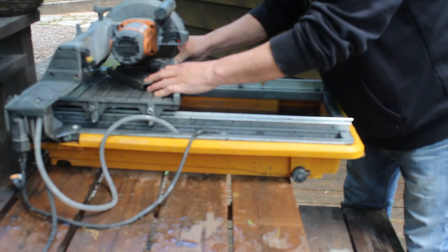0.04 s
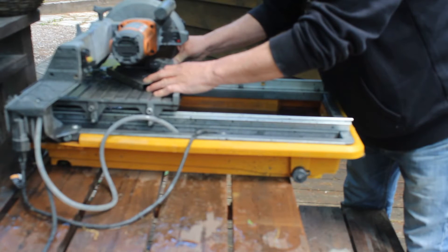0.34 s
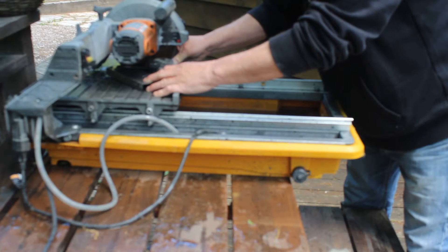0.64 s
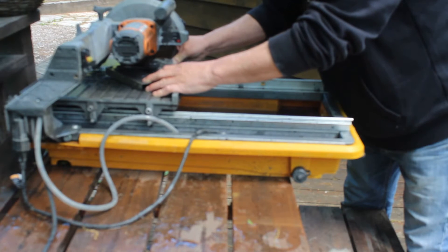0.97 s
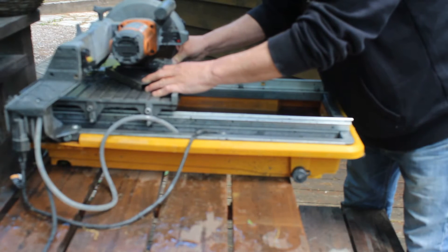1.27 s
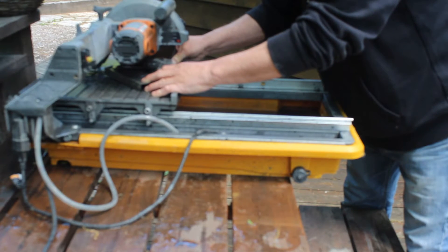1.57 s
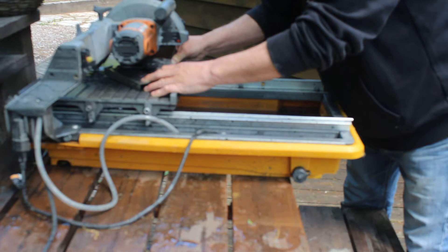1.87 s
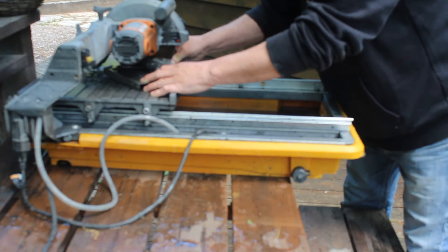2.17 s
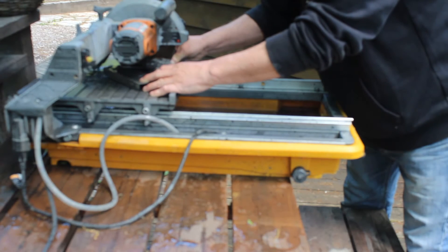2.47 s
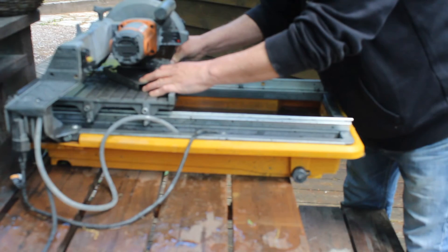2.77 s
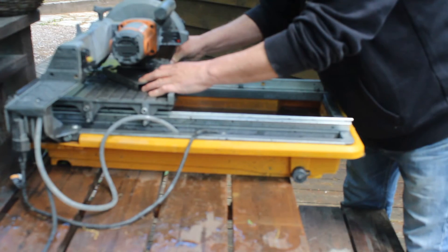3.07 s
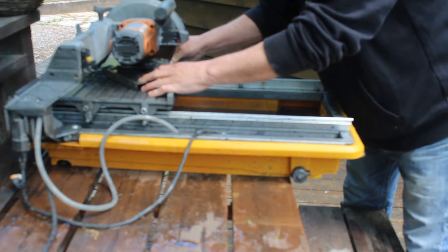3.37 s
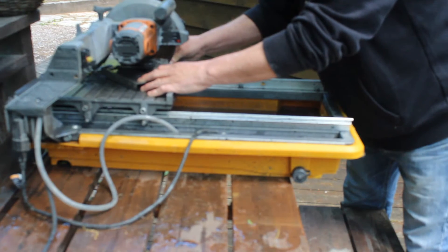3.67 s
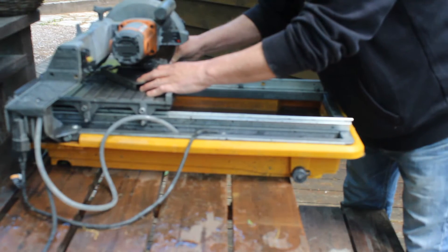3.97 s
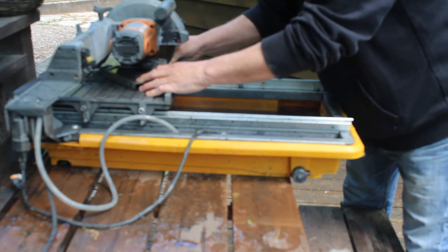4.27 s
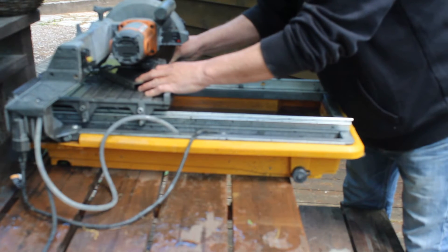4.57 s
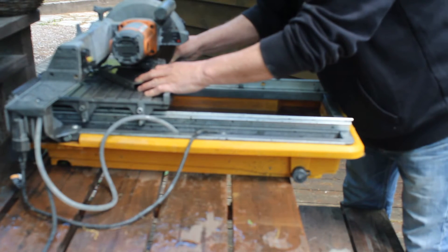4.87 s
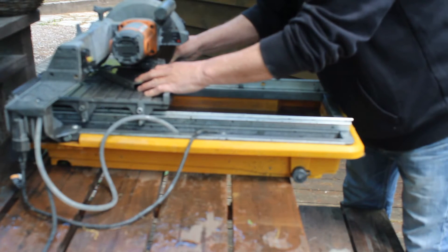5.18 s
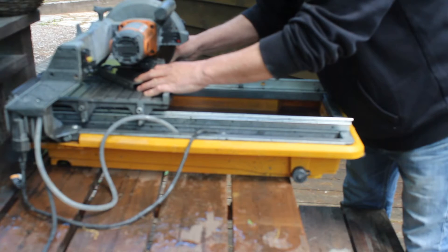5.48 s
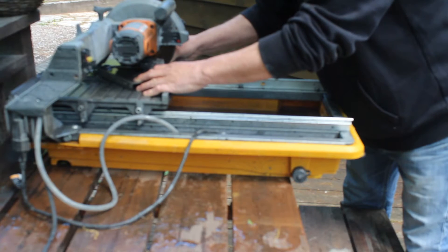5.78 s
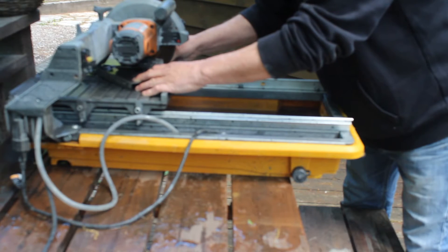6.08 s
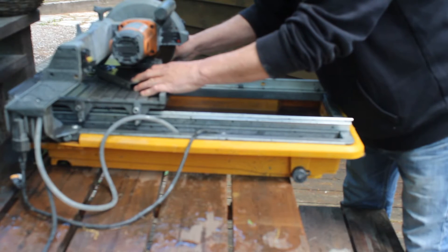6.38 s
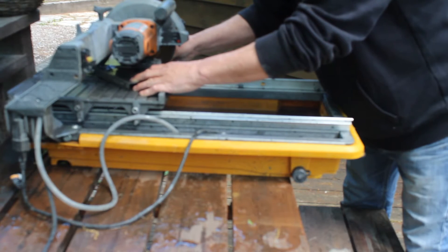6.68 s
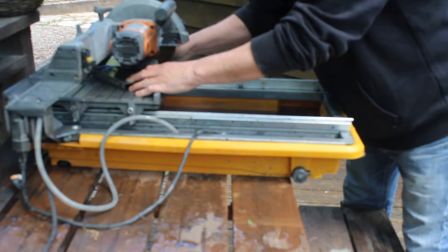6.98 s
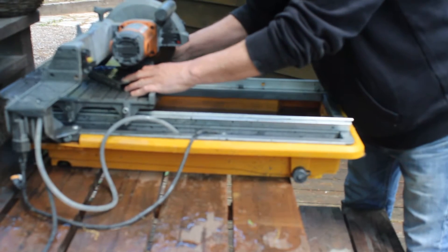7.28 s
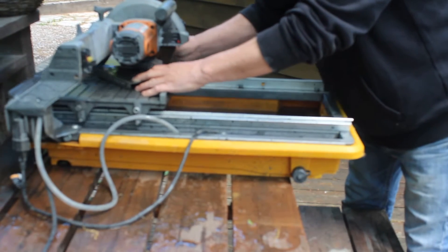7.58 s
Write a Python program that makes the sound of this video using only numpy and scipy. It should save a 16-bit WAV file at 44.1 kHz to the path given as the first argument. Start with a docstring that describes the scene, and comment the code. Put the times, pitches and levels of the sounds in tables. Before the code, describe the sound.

Already cutting, a wet saw grinds steadily through stone, close by in the open air. The blade rings and sings over a harsh hiss, while the motor's whine slowly recedes. As the load eases, the pitch climbs a little and wavers, and a brief rapid rattle comes through. Two shrill screeches finish the stretch, with a short dip between them as the blade nearly loses contact.

```python
"""Wet tile saw cutting a rock

A small hand-held rock is fed into the saw, outdoors on a wooden deck. Diamond grit grinds in a pattern
that repeats each turn, the steel blade rings and sings as the kerf deepens, and the geared motor whines.
Towards the end the load eases, the blade speeds up and the rock's thin last edge screeches,
almost losing contact for a moment before it bites again."""
import sys
import numpy as np
from scipy import signal
from scipy.fft import rfft, irfft, next_fast_len
from scipy.io import wavfile
from scipy.ndimage import uniform_filter1d

SR = 44100
rng = np.random.default_rng(int(sys.argv[2]) if len(sys.argv) > 2 else 0)


def unload_wav(signal):
    """Save mono or channel-first audio to the path in sys.argv[1] as 16-bit WAV at rate SR, clipped to [-1, 1]."""
    wavfile.write(
        sys.argv[1],
        SR,
        np.round(np.clip(np.atleast_2d(signal).T, -1, 1) * 32767).astype(np.int16),
    )


N = 341334
TIME = np.arange(N) / SR
DEPTH = np.arange(N) / N   # steady feed: 0 at the start, 1 when the blade is through
FFT_SIZE = next_fast_len(N)
BINS_HZ = np.fft.rfftfreq(FFT_SIZE, 1 / SR)


def from_db(db):
    """Decibels to gain."""
    return 10 ** (np.asarray(db) / 20)


def rms_one(x):
    """Scale to unit rms."""
    return x / np.sqrt(np.mean(x ** 2) + 1e-20)


def envelope(points):
    """Straight ramps between (t/s, value) breakpoints."""
    return np.interp(TIME, *np.transpose(points))


def drift(rate):
    """Smooth random modulation of unit rms that changes about rate times a second."""
    hop = 100
    pole = np.exp(-2 * np.pi * hop * rate / SR)
    slow = signal.lfilter([1], [1, -2 * pole, pole * pole], rng.standard_normal(N // hop + 1002))[1000:]
    return np.interp(np.arange(N) / hop, np.arange(len(slow)), rms_one(slow))


def bumps(rows):
    """A bell-shaped level move in dB for each (t/s, length/s, level/dB)."""
    return sum(db * np.exp(-(2 * (TIME - t) / length) ** 2) for t, length, db in rows)


def swell(start, end, fade_s):
    """The samples of one event and a gain that fades in around start and out around end."""
    span = slice(*np.searchsorted(TIME, [start - fade_s / 2, end + fade_s / 2]))
    return span, np.clip(np.minimum(TIME[span] - start, end - TIME[span]) / fade_s + .5, 0, 1)


def near_depth(depth, reach):
    """Gain of a mode that is driven over one stretch of the cut."""
    return 1 / np.sqrt(1 + ((DEPTH - depth) / reach) ** 6)


def ring(x, hz, width_hz):
    """A resonance applied twice for steep skirts, at unit rms."""
    r = np.exp(-np.pi * width_hz / SR)
    section = [0.94, 0.0064, -0.9, 1, -2 * r * np.cos(2 * np.pi * hz / SR), r * r]
    return rms_one(signal.sosfilt([section] * 2, x))


def tone(cycles, flutter_db, jitter_rad):
    """A sine shaken in level and phase."""
    phase = 2 * np.pi * (cycles + rng.random()) + jitter_rad * drift(8.4)
    return rms_one(from_db(flutter_db * drift(7.9)) * np.sin(phase))


def rim_grit(turns, wear_s=0.6005, grains=480):
    """The uneven grit round the rim loops every turn; the pattern touching the rock slowly changes."""
    profiles = rng.standard_normal((64, grains))
    row, blend = np.divmod(TIME / wear_s, 1)
    row, place = row.astype(int), (turns % 1 * grains).astype(int)
    old, new = profiles[row, place], profiles[row + 1, place]
    grit = old * np.cos(blend * np.pi / 2) + new * np.sin(blend * np.pi / 2)
    return rms_one(signal.lfilter([1, -.15], [1], grit))   # sharp grains favour the treble


def abrasion(turns, rim_db, chip_db, chips_per_s, wobble_db, chatter_db):
    """Force at the kerf: fine scraping, rim grit and breaking chips, harder at the blade's high spot."""
    scrape = rng.standard_normal(N)
    chips = (rng.random(N) < chips_per_s / SR) * rng.standard_normal(N)
    angle = 2 * np.pi * turns
    high_spot = np.cos(angle) + 0.55 * np.cos(2 * angle) + 0.68 * np.cos(3 * angle)
    pressure = from_db(wobble_db * high_spot + chatter_db * drift(52))
    texture = scrape + from_db(rim_db) * rim_grit(turns) + from_db(chip_db) * rms_one(chips)
    return rms_one(pressure * texture)


def disc_ripple(depth_db, full_from_hz):
    """Countless weak modes of the disc ripple the treble, a few tens of Hz apart."""
    grid_hz = np.arange(0, SR / 2, 22)
    ripple = np.interp(BINS_HZ, grid_hz, rng.standard_normal(len(grid_hz)))
    return depth_db * ripple * np.minimum(BINS_HZ / full_from_hz, 1)


# Broad EQ curve of the grind: f/Hz, gain/dB
GRIND_EQ = [(25, -34), (70, -35), (105, -28), (170, -9), (260, -9), (400, -6), (560, -1), (700, -6),
            (1100, -0.5), (2200, -0.5), (4200, -1.5), (6200, -3), (8000, -9), (15500, -16)]
# Fixed peaks (+) and dips (-) of blade, guard and tray: f/Hz, width/Hz, gain/dB
SAW_RESONANCES = [(194, 32, -10.5), (387, 92, 8.5), (480, 160, -4), (670, 28, 0), (789, 47, 6.5),
                  (1390, 800, 4.5), (2950, 590, 2), (4500, 270, -3), (5060, 590, 3), (6940, 140, 3),
                  (7830, 200, 0), (8450, 230, 2), (9230, 200, 3), (9450, 230, -3.5), (9740, 110, 5),
                  (10200, 310, 3), (10830, 190, 5), (11100, 280, -4.5), (11650, 580, 5), (13200, 530, 7.5),
                  (13900, 400, -4), (14300, 160, 5), (14400, 170, 8), (14980, 350, 4.5)]
def grinding(force):
    """The force at the kerf sounds through the resonances of the saw."""
    hz, db = np.transpose(GRIND_EQ)
    eq_db = np.interp(np.log(BINS_HZ + 1), np.log(hz), db)
    eq_db += disc_ripple(depth_db=2.5, full_from_hz=14000)
    for centre, width, peak_db in SAW_RESONANCES:
        eq_db += peak_db / (1 + (2 * (BINS_HZ - centre) / width) ** 2) ** 1.2
    return rms_one(irfft(rfft(force, FFT_SIZE) * from_db(eq_db), FFT_SIZE)[:N])


# Ringing modes of the steel disc: f/Hz, width/Hz, relative level/dB, loudest at depth/0-1
DISC_MODES = [(1050, 300, -29, 0.16), (1370, 350, -39, 0.54), (2660, 900, -33, 0.67), (3074, 130, -37, 0.1),
              (5096, 110, -33.5, 0.27), (8480, 140, -38.5, .5), (8700, 270, -38.5, 0.1),
              (10350, 260, -38, 0.73), (11200, 140, -44, 0.2), (11830, 180, -40, 0.4),
              (12960, 130, -39, .15), (13360, 200, -40, .58), (14650, 440, -37.5, 0.5),
              (14920, 150, -40, .16)]
def blade_ring(force):
    """Narrow modes of the disc fade in and out as the contact moves."""
    return sum(from_db(db) * near_depth(depth, reach=0.18) * ring(force, hz, width)
               for hz, width, db, depth in DISC_MODES)


# Resonances that make the blade sing: f/Hz, width/Hz, relative level/dB, depth/0-1, reach/depth
SINGING_MODES = [(90, 30, -56.5, 0.9, 0.22), (176, 36, -52.5, .8, 0.34), (272, 57, -41.5, .72, 0.076),
                 (340, 42, -37.5, 0.63, 0.18), (490, 180, -42.5, 0.74, 0.036), (758, 60, -38.5, .6, 0.23),
                 (1050, 54, -32.5, .21, 0.15), (985, 32, -33, 0.78, 0.056), (1233, 89, -35, 0.62, 0.22),
                 (1350, 80, -39, 0.87, .12), (1450, 80, -29, 0.55, .11), (1510, 47, -36, 0.5, 0.2),
                 (1656, 150, -34.5, 0.8, 0.12), (2780, 125, -34.5, 0.74, 0.12),
                 (2950, 150, -35.5, .73, 0.073), (3100, 70, -35, 0.28, .1), (5103, 47, -32.5, .32, 0.068)]
def blade_song(turns, speed, harmonics=60, low_cut_hz=125):
    """Harmonics of the blade speed sing out where they lie in a driven resonance."""
    coarse = slice(None, None, 200)   # control rate
    faint_buzz = (2030, 2330, -47, .5, 0.4)   # one broad mode under the song
    driven = [(hz, width, from_db(db) * near_depth(depth, reach)[coarse])
              for hz, width, db, depth, reach in [*SINGING_MODES, faint_buzz]]
    song = np.zeros(N)
    for k in range(1, harmonics + 1):
        pitch = k * speed[coarse]
        power = sum(gain ** 2 / (1 + (2 * (pitch - hz) / width) ** 8) for hz, width, gain in driven)
        power *= np.minimum(pitch / low_cut_hz, 1) ** 4   # the disc radiates little bass
        level = np.interp(TIME, TIME[coarse], np.sqrt(power))
        song += level * tone(k * turns, flutter_db=1.5, jitter_rad=.2)
    return song


# Modes struck by the knock: f/Hz, width/Hz, relative level/dB
KNOCK_RESONANCES = [(1340, 430, 3.5), (3060, 1300, 1), (5200, 1100, -14)]
# Spells of harder knocking: t/s, length/s, boost/dB
KNOCK_ACCENTS = [(2.25, .5, 5), (6.15, .7, 10)]
def rim_knock(turns, uneven_db=0.5):
    """A high spot on the rim strikes once a turn, each blow with its own strength."""
    blows = np.diff(np.floor(turns), prepend=0) * from_db(uneven_db * drift(40))
    ringing = sum(from_db(db) * ring(blows + 1e-18, hz, width) for hz, width, db in KNOCK_RESONANCES)
    return from_db(bumps(KNOCK_ACCENTS)) * rms_one(ringing)


# Running tones of the drive: f/blade speed, relative level/dB
GEAR_TONES = [(1, -74), (2, -56), (6, -52), (7, -53), (8, -54), (9.1429, -47), (13.7143, -41), (11, -47),
              (22, -45)]
# Water pump and mains hum: f/Hz, starting level/dB
HUM_TONES = [(120, -54), (205, -50), (240, -50)]
def motor(turns, gear_ratio=32 / 7, whine_fall_db_per_s=1.87, hum_fall_db_per_s=3):
    """The armature whines over gears and pump; whine and hum recede once the blade is well in."""
    receding_s = np.maximum(TIME - 2.28, 0)
    whine = tone(gear_ratio * turns, flutter_db=1, jitter_rad=.16)
    whine *= from_db(-33.5 - whine_fall_db_per_s * receding_s)
    gears = sum(from_db(db) * tone(k * turns, flutter_db=2.5, jitter_rad=.16) for k, db in GEAR_TONES)
    hum = sum(from_db(db) * tone(hz * TIME, flutter_db=0, jitter_rad=.1) for hz, db in HUM_TONES)
    hum *= from_db(-hum_fall_db_per_s * receding_s)
    return whine + from_db(-1) * gears + hum


# Body rumble in the lowest band, draining away as the blade breaks out: t/s, level/dB
RUMBLE_ENVELOPE = [(0, -31.6), (4.9, -31), (5.8, -31.5), (6.1, -33.5), (6.7, -32.5), (7.15, -39),
                   (7.45, -32), (7.74, -40)]
# Rock crunch, grinding and wet hiss, the three bands above: mid-cut level/dB, change over the cut/dB
UPPER_BANDS = [(-23.6, 0), (-20.5, 2.2), (-23.5, -2)]
def feed(kerf, crossovers_hz=(900, 2400, 7000), window_s=0.29):
    """The hand's feed sets the power in each of four bands; grinding and ringing share it."""
    levels_db = [envelope(RUMBLE_ENVELOPE)] + [db + change * (DEPTH - .5) for db, change in UPPER_BANDS]
    spectrum = rfft(kerf, FFT_SIZE)
    band_of_bin = np.searchsorted(crossovers_hz, BINS_HZ)
    cut = np.zeros(N)
    for k, db in enumerate(levels_db):
        band = irfft(spectrum * (band_of_bin == k), FFT_SIZE)[:N]
        running_rms = np.sqrt(np.abs(uniform_filter1d(band ** 2, int(window_s * SR))) + 1e-20)
        cut += from_db(db) * band / running_rms
    return cut


# The hand pushes harder (+) or lets up (-): t/s, length/s, gain/dB
HAND_NUDGES = [(0.48, 0.072, -2), (0.8, 0.036, 1.5), (2.67, 0.069, -1.5), (2.8, 0.12, 1), (3.08, 0.089, 1),
               (3.33, 0.059, -3.3), (3.79, .08, -1.5), (4.32, 0.054, 2), (4.39, 0.072, -2.2), (5.44, .1, 1),
               (6.46, 0.067, -1.1)]
def bite(tremor_db=0.26, lapse_db=-3, grab_db=0.44):
    """Gain ride on the cut: the blade bites harder or softer under a slightly unsteady hand."""
    level_db = tremor_db * drift(10) + bumps(HAND_NUDGES)
    span, fade = swell(7.15, 7.36, fade_s=0.043)   # the rock almost leaves the blade
    level_db[span] += lapse_db * fade
    for start, end, _ in SCREECH_CUES:   # the blade grabs in a screech
        span, fade = swell(start, end, fade_s=.08)
        level_db[span] += grab_db * fade
    return from_db(level_db)


# Screeches as the blade breaks out: start/s, end/s, gain/dB
SCREECH_CUES = [(6.72, 7.16, 1.5), (7.4, 7.9, 2.5)]
# Modes that ring in a screech: f/Hz, width/Hz, relative level/dB
SCREECH_RESONANCES = [(1900, 180, -28), (3100, 350, -31), (3480, 220, -27.5), (4056, 87, -28.5),
                      (4960, 100, -28.5), (6200, 300, -30.5), (10400, 240, -39), (11800, 240, -40),
                      (12850, 240, -41)]
def screeching(force, build_s=0.19):
    """The thin last edge of the rock screeches on the blade, ringing up the same modes each time."""
    screeches = np.zeros(N)
    for start, end, gain_db in SCREECH_CUES:
        span, fade = swell(start, end, fade_s=0.058)
        attack = 1 - np.exp(-np.maximum(TIME[span] - start, 0) / build_s)
        ringing = sum(from_db(db) * ring(force[span], hz, width) for hz, width, db in SCREECH_RESONANCES)
        screeches[span] += from_db(gain_db) * fade * attack * ringing
    return screeches


# Blade speed, rising as the load eases: t/s, turn rate/Hz
BLADE_SPEED = [(0.0, 84.85), (0.4, 84.1), (0.95, 85.57), (1.3, 84.85), (2.1, 84.9), (2.65, 84.73),
               (3.3, 84.2), (3.85, 85.12), (4.7, 84.83), (4.9, 85.68), (5.3, 89.07), (5.6, 91.65),
               (5.9, 90.52), (6.49, 87.6), (6.8, 89.05), (7.2, 89.8), (7.5, 92.53), (7.74, 93.82)]
def scene():
    """Blade speed and depth of cut drive the layers, mixed in mono to both channels."""
    speed = envelope(BLADE_SPEED)
    turns = np.cumsum(speed) / SR
    force = abrasion(turns, rim_db=-5, chip_db=-5.5, chips_per_s=2500, wobble_db=0.7, chatter_db=0.7)
    rubbing = abrasion(turns, rim_db=1, chip_db=-1.5, chips_per_s=860, wobble_db=2.5, chatter_db=3)
    blade = blade_ring(rubbing) + screeching(rubbing) + blade_song(turns, speed)
    kerf = from_db(-18.5) * grinding(force) + blade + from_db(-37.5) * rim_knock(turns)
    return np.tile(bite() * feed(kerf) + motor(turns), (2, 1))


def record(dry):
    """A steep low-pass takes off the very top."""
    cutoff_hz = 15750
    return signal.sosfilt(signal.ellip(12, .1, 80, cutoff_hz, fs=SR, output="sos"), dry)


dry = scene()
out = record(dry)
unload_wav(out)
```